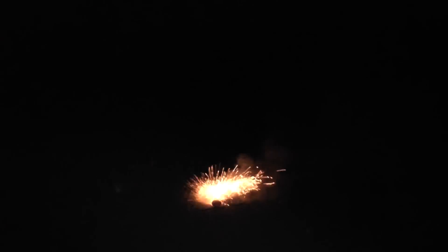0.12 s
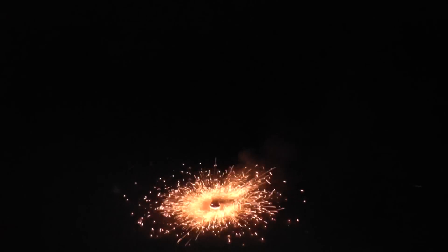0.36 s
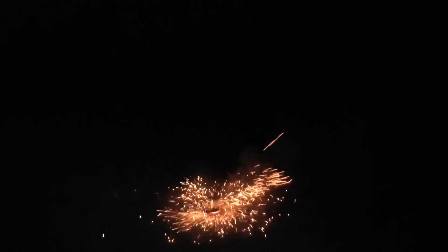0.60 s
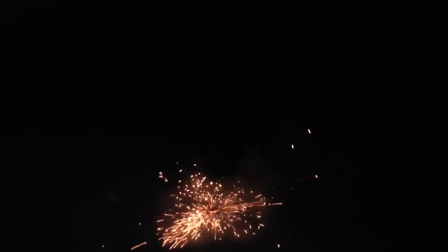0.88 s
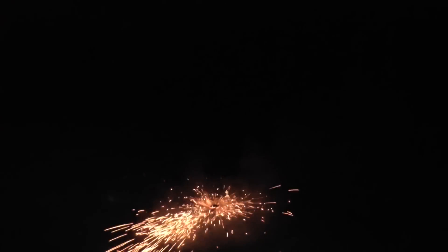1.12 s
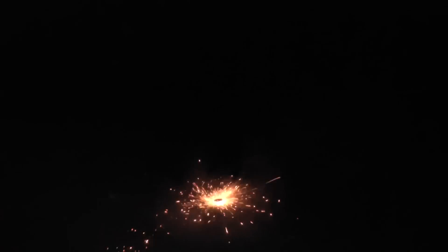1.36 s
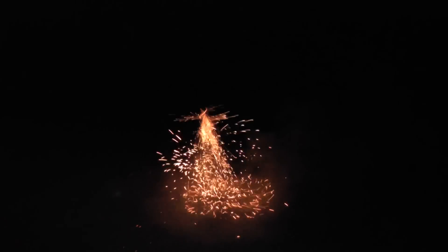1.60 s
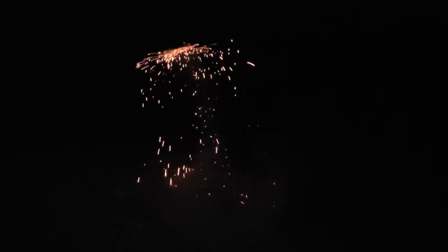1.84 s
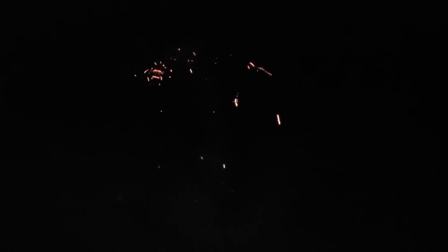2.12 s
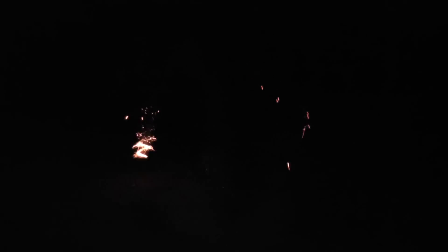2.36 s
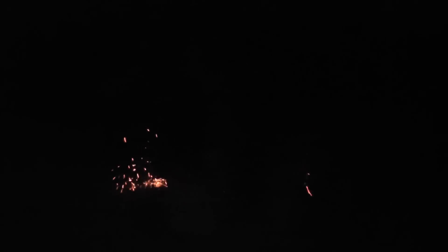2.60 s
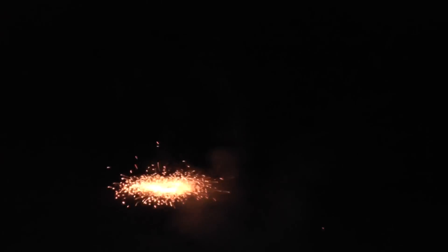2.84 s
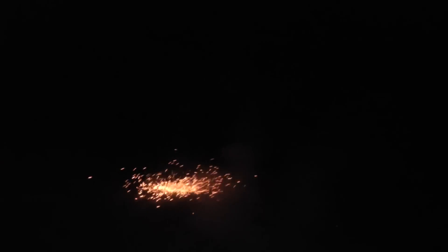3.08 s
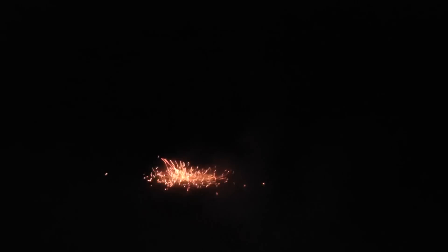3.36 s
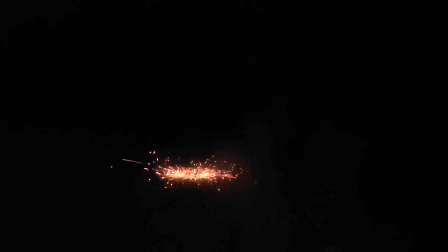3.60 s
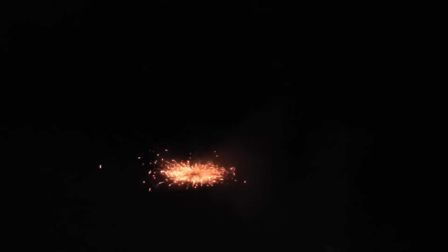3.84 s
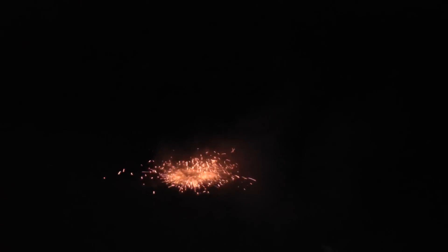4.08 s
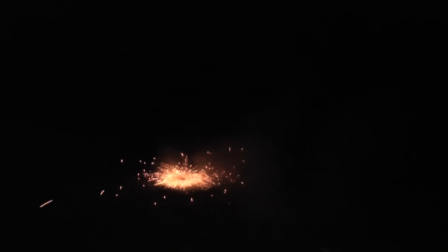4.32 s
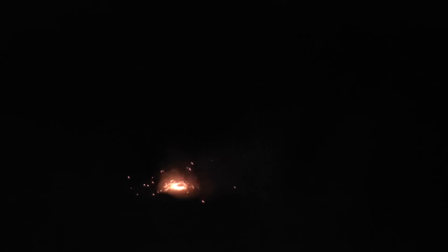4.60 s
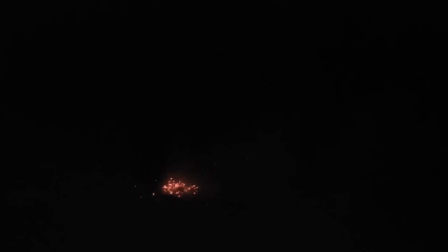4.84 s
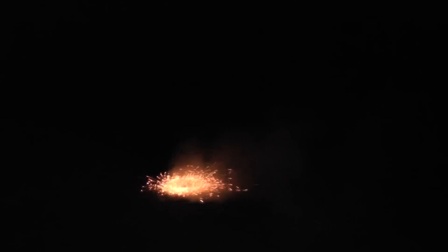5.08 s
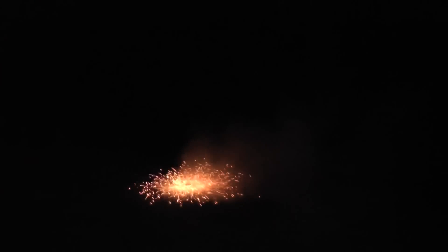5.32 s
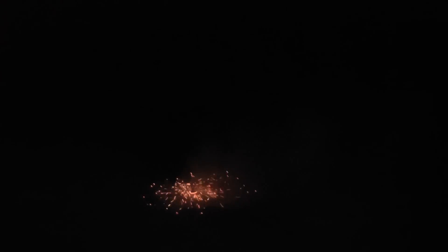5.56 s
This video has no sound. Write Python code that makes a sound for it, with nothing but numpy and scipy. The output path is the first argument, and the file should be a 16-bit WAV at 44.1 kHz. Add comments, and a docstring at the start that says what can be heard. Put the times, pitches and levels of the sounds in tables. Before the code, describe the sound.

Outdoors at night, a few metres from a phone, a small spinning firework catches at once with a bright throbbing hiss, spark crackle and hard pops. It flares and leaps near 1.4 s, then cuts off in a cluster of dull pops. After a faint smoulder with scattered pops, a faster fluttering burn slows and fades; a last burn whirs fastest to the end.

```python
"""A small spinning ground firework burns in spurts a few metres from a phone, over a faint night rumble.
First a burn of nozzle gas hisses and roars, throbbing as it turns, among metal sparks and pellet pops.
At 1.4 s it leaps, and the bounce off the ground lags; a short burn ends in a cluster of pops, then it smoulders.
From 2.6 s it burns and spins faster, slows and dies down; from 4.9 s a last burn spins up fastest of all.
Gas and sparks are coloured noise and clicks, pops are short swings, and ground and edge colour them."""
import sys
import numpy as np
from scipy import signal
from scipy.fft import rfft, irfft
from scipy.io import wavfile
from scipy.ndimage import uniform_filter1d

SR = 44100
rng = np.random.default_rng(int(sys.argv[2]) if len(sys.argv) > 2 else 0)


def level_to_linear(level):
    """Convert decibel levels to linear amplitude factors, elementwise."""
    exponent = np.asarray(level, float) / 20
    return 10 ** exponent


def store_pcm(level_fs):
    """Save levels as 16-bit WAV."""
    pcm = np.round(np.clip(level_fs, -1, 1) * 32767).astype(np.int16)
    wavfile.write(sys.argv[1], SR, np.atleast_2d(pcm).T)


N = 251354
TIME = np.arange(N) / SR


def colour(x, points):
    """Filter through (Hz, dB) points that never sounds early: minimum phase from the folded cepstrum."""
    hz, db = np.transpose(points)
    grid = np.fft.rfftfreq(4096, 1 / SR)
    log_gain = np.interp(np.log(grid + 1), np.log(hz), db) * np.log(10) / 20
    cepstrum = irfft(log_gain)
    half = len(cepstrum) // 2
    folded = np.r_[cepstrum[0], 2 * cepstrum[1:half], np.zeros(half)]
    response = irfft(np.exp(rfft(folded)))[:half]
    return signal.fftconvolve(x, response)[:N]


def noise(points):
    """Coloured noise with a standard deviation of 1."""
    x = colour(rng.standard_normal(N), points)
    return x / x.std()


def walk(rate):
    """Random levels held 1 / rate seconds and smoothed twice; spread 1."""
    hold = int(SR / rate)
    x = np.repeat(rng.standard_normal(N)[:N // hold + 1], hold)
    for _ in range(2):
        x = uniform_filter1d(x, hold)
    x = x[:N]
    return x / x.std()


def curves(rows):
    """Columns of a table joined by straight lines in time."""
    s, *columns = np.transpose(rows)
    return [np.interp(TIME, s, c) for c in columns]


def delay(x, ms):
    """The sound a fixed or moving time later."""
    return np.interp(TIME - ms / 1e3, TIME, x, left=0)


def past(s):
    """Seconds since a moment, zero before it."""
    return np.maximum(TIME - s, 0)


def until(s):
    """Seconds left to a moment, zero after it."""
    return np.maximum(s - TIME, 0)


# Reflection off a nearby edge, shifting as the firework moves.
# Each row: time in seconds, delay in ms, share of the direct sound (below zero it returns inverted).
EDGE_ECHO = [(0, 2.16, -.3), (1.4, 2.11, -.28), (1.5, 2.1, 0), (2.5, 1.96, 0), (2.6, 1.96, .4),
             (5.7, 1.95, .4)]
# Hollows, with slight lifts between, left by the ground and the hand around the phone.
# Each row: frequency in Hz, gain in dB.
PLACE_COLOUR = [(300, -0.5), (395, -8), (520, -3), (980, -1.5), (1140, -5.5), (1290, 1.5), (1650, 2),
                (1980, -6), (2500, -0.5)]


def reflect(x):
    """Direct sound plus a late copy of its treble from the edge, then the hollows of the place."""
    ms, share = curves(EDGE_ECHO)
    edge_band = signal.butter(1, [4250, 10100], "band", fs=SR)  # Hz that the edge returns
    echo = signal.filtfilt(*edge_band, delay(x, ms))
    return colour(x + share * echo, PLACE_COLOUR)


# Tone of the night rumble. Each row: frequency in Hz, gain in dB.
NIGHT_COLOUR = [(30, -11), (70, -31.5), (150, -9), (400, -9.5), (1000, -12), (1300, -25.5), (2200, -20.5),
                (5000, -22.5), (16000, -49)]


def night():
    """Faint coloured noise: a wandering part in the middle and a steady part for the stereo difference."""
    night_db = -52
    middle = reflect(level_to_linear(night_db + 3.1 * walk(11.0)) * noise(NIGHT_COLOUR))
    wide = level_to_linear(night_db - 12.5) * noise(NIGHT_COLOUR)
    return middle, wide


def swings(rows):
    """Single slow swings of pressure that die away within about a cycle."""
    total = np.zeros(N)
    for s, db, hz in rows:
        cycles = past(s) * hz
        total += level_to_linear(db) * np.sin(2 * np.pi * cycles) * np.exp(-2 * cycles)
    return total


# Slow side swings. Each row: start in seconds, level in dB before dying away, pitch in Hz.
SIDE_SWINGS = [(1.33, -42, 60), (5.05, -30, 70)]


def side_swings():
    """Slow low swings in the stereo difference only, opposite in left and right."""
    return swings(SIDE_SWINGS)


# Deep thumps. Each row: start in seconds, level in dB before dying away, pitch in Hz.
THUMPS = [(0.079, -23.5, 101), (.694, -38, 120), (1.006, -28, 122), (1.328, -39, 50), (2.7, -39, 50),
          (3.271, -45, 134), (3.919, -39, 91), (5.033, -35, 94)]


def thumps():
    """Slow pressure swings, most of them under a pop or a flare."""
    return swings(THUMPS)


# Short bright bursts. Each row: start in seconds, level of the sizzle at its fullest in dB.
BRIGHT_BURSTS = [(.823, -44), (2.4867, -57), (2.789, -33), (2.831, -30), (4.4746, -53), (4.727, -55),
                 (5.056, -32)]
# Tones of the hiss and of the thinner sizzle, which the jet plays too. Each row: frequency in Hz, gain in dB.
HISS_COLOUR = [(900, -37.5), (1500, -20.5), (2900, -4.5), (4000, -4.5), (4600, 1), (6000, 4), (8300, -2.5),
               (10000, -20), (16000, -61)]
SIZZLE_COLOUR = [(6000, -36), (9000, -4.5), (12000, -12.5), (14000, -17), (16000, -23)]


def bright_bursts():
    """Short bell-shaped noise bursts: some strengthen the turning jet's throb, others tick in the smoulder."""
    burst_s = 2.5e-3  # each is fullest this long after its start
    swell = sum(level_to_linear(db) * np.exp(-((TIME - s - burst_s) / burst_s) ** 2) for s, db in BRIGHT_BURSTS)
    return swell * (noise(SIZZLE_COLOUR) + level_to_linear(8) * noise(HISS_COLOUR))


# Tone of a pellet's crack. Each row: frequency in Hz, gain in dB.
CRACK_COLOUR = [(150, -37), (700, -11), (1500, -15), (2500, -6.5), (4900, -9.5), (5700, 0.5), (6500, -8),
                (9000, -18), (16000, -31)]
# Pellet pops. Each row: time in seconds, level in dB, pitch of the snap in Hz,
# then the low ring and the crack (before its tone is applied), both in dB against that level.
POPS = [(0.0802, -20.5, 390, -5.5, 4), (0.5082, -19.5, 630, -0.5, 10.5), (0.517, -24, 740, -14, -13),
        (0.6981, -20.5, 560, -1.5, 6), (0.8013, -21.5, 796, -8, 14.5), (0.962, -30, 565, -7, -15),
        (1.0088, -20, 850, -6.5, 11), (1.623, -32, 560, -7, -17), (1.684, -31, 646, -48, -4),
        (1.841, -18.5, 507, -24, -20), (1.849, -17.5, 734, -30, -6), (1.858, -20, 690, -32, -5),
        (1.865, -18, 664, -33, -11), (1.876, -19, 454, -28, -18), (1.941, -28, 734, -6, -27),
        (2.1459, -24, 580, -11, -31), (2.1494, -28, 235, -23, -30), (2.1774, -31, 506, -20, -25),
        (2.186, -30, 420, -16, -24), (2.214, -35.5, 586, -26, -16), (2.355, -34, 300, -12, -30),
        (2.439, -23, 630, -8.5, 13.5), (2.526, -28.5, 426, -3.5, -26), (2.928, -28, 607, -5.5, -14),
        (3.152, -23.5, 380, -4, -14), (3.272, -27, 705, -5.5, -11), (3.923, -23.5, 736, -10, 6),
        (3.952, -32.5, 298, 5, -15), (4.091, -34.5, 397, -2, -12), (4.8332, -25, 377, -5.5, -24),
        (4.959, -22.5, 674, -7.5, 3), (5.474, -31, 844, -11, -4)]


def pops():
    """Each pellet: a snap of a cycle or two, a low ring swelling just after, a rough tail and a crack."""
    snap_cycles = 0.71  # the snap is fullest around this many cycles in
    ring_ms, ring_swell_ms, tail_ms, crack_ms = 1.79, 2.6, 14.5, 3  # time constants
    tail_db, shock_db = -14, 17  # tail against the pop's level, shock front against the crack
    thud, crack = np.zeros((2, N + SR))
    t = TIME[:SR // 10]
    t_ms = t * 1e3
    chance = rng.standard_normal((len(POPS), 2, len(t)))
    ring_hz = 237.51 + 96.57 * np.exp(-t / 0.0023)  # the ring drops in pitch
    ring = np.sin(2 * np.pi * np.cumsum(ring_hz) / SR)
    ring *= np.exp(-t_ms / ring_ms) * (1 - np.exp(-t_ms / ring_swell_ms))
    for (s, db, hz, ring_db, crack_db), (low, high) in zip(POPS, chance):
        i = int(s * SR)
        age = t * hz / snap_cycles
        snap = np.sin(2 * np.pi * hz * t) * (age * np.exp(1 - age)) ** 2
        rough = signal.lfilter(*signal.butter(3, [200, 1.62 * hz], "band", fs=SR), low)
        tail = level_to_linear(tail_db) * rough / rough.std() * np.exp(-t_ms / tail_ms) * np.minimum(age, 1)
        thud[i:i + len(t)] += level_to_linear(db) * (level_to_linear(ring_db) * ring / ring.max() - snap + tail)
        i -= SR // 2200  # the crack leads the thud
        crack[i:i + len(t)] += level_to_linear(db + crack_db) * high * np.exp(-t_ms / crack_ms)
        crack[i] -= level_to_linear(db + crack_db + shock_db)  # a shock front opens it
    return thud[:N] + colour(crack, CRACK_COLOUR)


# Steady burns. Each row: catches in seconds, dies in seconds, hiss on catching in dB, hiss it builds
# towards in dB, sag in dB per second, then roar and sizzle in dB against the hiss.
BURNS = [(0.032, 1.546, -31.5, -28.5, 1.96, -16, -10.5), (1.56, 1.844, -44.5, -29.5, 3.8, -16, -6),
         (2.62, 4.32, -39, -28.5, 2.16, -18.5, -13.5), (4.92, 5.946, -42.5, -27, 0.54, -17.5, -11.5)]
# Flares of richer powder. Each row: full in seconds, rise in seconds, hold in seconds, hiss in dB,
# then roar and sizzle in dB against the hiss.
FLARES = [(0.036, 0.016, 0.042, -28.5, -11.5, -29), (0.158, 0.056, 0.02, -27, -8.5, -8),
          (.26, 0.034, .13, -41, 1, -18), (1.333, 0.01, 0.03, -23, -36, -9.5),
          (1.418, 0.061, 0.083, -25.5, -10.5, -7), (2.679, 0.023, .18, -26, -11.5, -10.5),
          (4.293, 0.11, 0.014, -46, 2.5, -22), (5.051, 0.061, 0.089, -25.5, -11, -12.5)]
# Smoulder once a burn is over. Each row: start in seconds, hiss in dB, cooling in dB per second,
# then roar and sizzle in dB against the hiss.
SMOULDERS = [(1.87, -56.5, 15, -6, -8.5), (4.33, -54.5, 5, -2, -20)]
# Moments when the burns falter or change colour. Each row: time in seconds, half width in seconds,
# change of the hiss in dB, change of the sizzle in dB.
FALTERS = [(2.96, 0.049, -1.8, -8), (3.56, 0.051, -5.5, 0), (4.25, 0.039, -3.5, -12)]


def burn():
    """Hiss, roar and sizzle in dB: the powers of burns, flares and smoulder add up."""
    build_s = 0.22
    catch_db_per_s, die_db_per_s, flare_die_db_per_s = 900, 489, 194
    flare_rise_db, flare_sag_db_per_s, roar_sag_db_per_s = 5.5, 14, 29
    stages = []
    falter_db, dull_db = sum(np.outer(db, np.exp(-((TIME - s) / half) ** 2)) for s, half, *db in FALTERS)
    for s, end, first_db, full_db, sag_db, roar_db, sizzle_db in BURNS:
        db = full_db - (full_db - first_db) * np.exp(-past(s) / build_s) - sag_db * past(s)
        db -= catch_db_per_s * until(s) + die_db_per_s * past(end)
        thin_db = db + sizzle_db + dull_db - die_db_per_s / 2 * past(end)  # the sizzle dies faster
        stages.append([db + falter_db, db + roar_db, thin_db])
    for s, rise, hold, db, roar_db, sizzle_db in FLARES:
        db = db - flare_rise_db * (until(s) / rise) ** 1.62 - flare_die_db_per_s * past(s + hold)
        hiss_db = db - flare_sag_db_per_s * past(s)
        stages.append([hiss_db, db + roar_db - roar_sag_db_per_s * past(s), hiss_db + sizzle_db])
    for s, db, cool_db, roar_db, sizzle_db in SMOULDERS:
        db = db - catch_db_per_s * until(s) - cool_db * past(s)
        stages.append([db, db + roar_db, db + sizzle_db])
    return 10 * np.log10(np.sum(level_to_linear(np.array(stages)) ** 2, axis=0))


def sparks():
    """Metal sparks burst as single clicks, many small and a few large; spread 1."""
    per_s, spread_db = 600, 8.0
    where, size = rng.random((2, N))
    clicks = (where < per_s / SR) * level_to_linear(-spread_db * np.log(size + .06))
    # the thin ones use the clicks backwards in time, so they fall apart from the dull ones
    both = colour(clicks, HISS_COLOUR) + level_to_linear(-6) * colour(clicks[::-1], SIZZLE_COLOUR)
    return both / both.std()


# Tone of the roar. Each row: frequency in Hz, gain in dB.
ROAR_COLOUR = [(40, -62), (100, -15.5), (280, -3.5), (800, 1.5), (1500, -5), (3000, -19)]
# Spin of the nozzle. Each row: time in seconds, turns per second, swell once a turn in dB.
SPIN = [(0, 13.42, 0), (.13, 16.17, .6), (.86, 23.98, 1.8), (1.42, 25.63, .7), (1.88, 40.56, 1.5),
        (2.715, 32, 2.4), (2.8, 44.5, 2.6), (2.9, 54.76, 2), (3, 58.68, 2.1), (3.24, 45.23, 2.4),
        (3.71, 29.22, 1.8), (4.21, 23.41, 1.4), (4.42, 13.61, 1.3), (5, 23.253, .8), (5.075, 24.5, 3.2),
        (5.13, 42.47, 4.6), (5.25, 72.1, 1.2), (5.37, 77.36, 1.5), (5.7, 79.17, 1.8)]


def jet():
    """Gas from the turning nozzle, with sparks and hum, and a second unrelated gas for the stereo difference."""
    sputter_db, own_db = 1.07, 1.22  # spread of the shared flutter and of each band's own
    hiss_db, roar_db, sizzle_db = burn()
    rate, once_db = curves(SPIN)
    turn = 2 * np.pi * np.cumsum(rate) / SR
    thrust = np.clip((roar_db + 49.5) / 9, 0, 1)
    # the jet is loudest side-on, so it swells twice a turn besides once; lost at full thrust
    twice_db = 2 * (1 - thrust)
    beam_db = once_db * np.cos(turn) + twice_db * np.cos(2 * turn + 2.83)
    # towards full thrust a sharp puff marks the moment the nozzle sweeps past
    beam_db += 1.3 * thrust * once_db * np.exp(8 * (np.cos(turn - 5.5) - 1))
    sputter = sputter_db * walk(130)  # uneven burning shakes all bands together
    hiss = level_to_linear(hiss_db + beam_db + sputter + 0.3 * own_db * walk(40))
    sizzle = level_to_linear(sizzle_db + 0.82 * beam_db + sputter + own_db * walk(24.61))
    roar = level_to_linear(roar_db + 0.2 * beam_db + 2.2 * sputter + own_db * walk(30))
    gas, other = [hiss * noise(HISS_COLOUR) + sizzle * noise(SIZZLE_COLOUR) + roar * noise(ROAR_COLOUR)
                  for _ in range(2)]
    # the lopsided case pushes air once a turn, more the faster it goes
    hum = level_to_linear(hiss_db - 36) * (rate / 80) ** 3 * np.cos(turn - 2.)
    return gas + hiss * level_to_linear(-10.0) * sparks() + hum, other


# Leap of the firework. Each row: time in seconds, lag of the bounce off the ground below it in ms.
FLIGHT = [(1.41, 0.0046), (1.49, 0.37), (1.54, 0.91), (1.9, 3.2), (2.55, 2.7), (2.6, 0.047)]


def ground_bounce(gas):
    """In the air the dull bounce below the firework lags, so a faint notch sweeps down."""
    lag_ms, = curves(FLIGHT)
    return level_to_linear(-4) * signal.lfilter(*signal.butter(1, 4000, fs=SR), delay(gas, lag_ms))


# What differs between the two microphones. Each row: frequency in Hz, gain in dB.
APART_COLOUR = [(60, -7), (130, -13), (250, -35.5), (1200, -16.5), (2200, -43), (6000, -26.5),
                (7200, -13.5), (9000, -6.5), (16000, -6)]


def stereo_difference(near, other):
    """What the left microphone gains and the right one loses of the firework."""
    side = colour(delay(near, .03) + level_to_linear(-5) * reflect(other), APART_COLOUR)
    middle_tones = signal.lfilter(*signal.butter(2, [400, 1900], "band", fs=SR), near)
    return side - .2 * middle_tones  # these lean to the right


def scene():
    """The firework sits near the middle and leaps once; the night is wider."""
    gas, other = jet()
    near = reflect(gas + ground_bounce(gas) + pops() + bright_bursts())
    rumble, wide = night()
    mid = near + rumble + thumps()
    side = stereo_difference(near, other) + wide + side_swings()
    return mid + np.array([[1], [-1]]) * side  # left, right


def low_pass(x):
    """Removes everything above the highest recorded frequency."""
    return signal.sosfilt(signal.butter(12, 15870, fs=SR, output="sos"), x)


def record(dry):
    """The phone cuts the deepest bass, below 65 Hz."""
    bass_cut = signal.butter(3, 65, "high", fs=SR, output="sos")
    mix = signal.sosfilt(bass_cut, dry)
    return low_pass(mix)


dry = scene()
out = record(dry)
store_pcm(out)
```